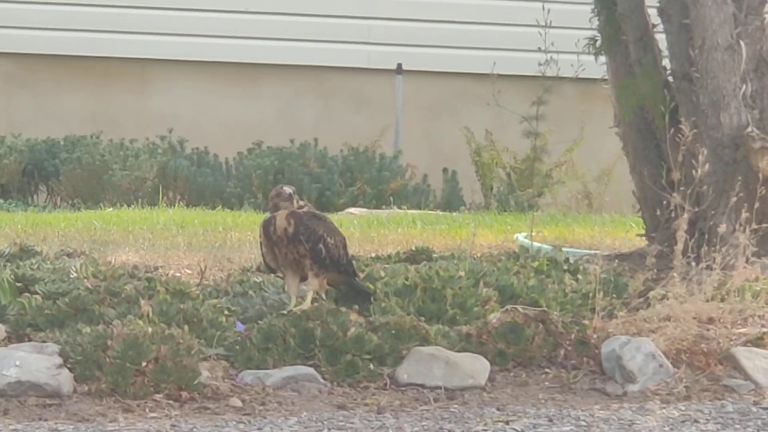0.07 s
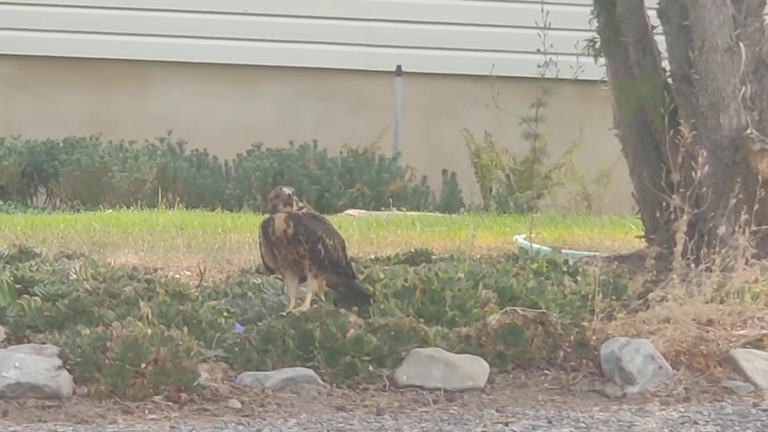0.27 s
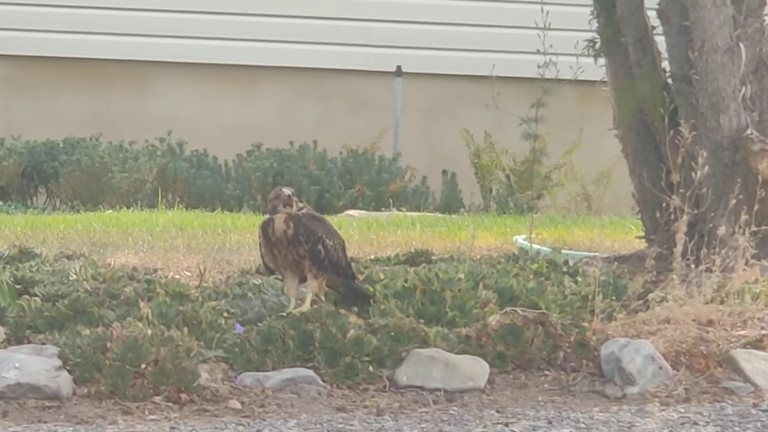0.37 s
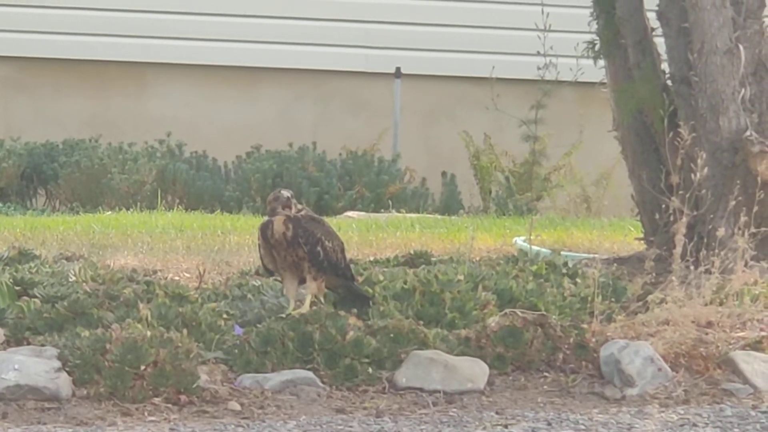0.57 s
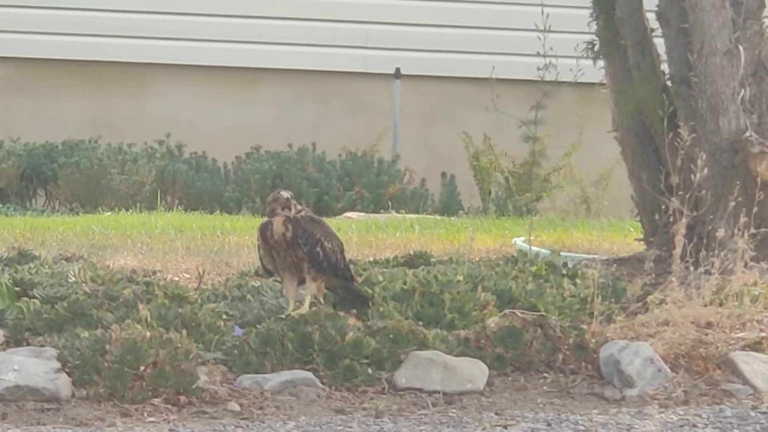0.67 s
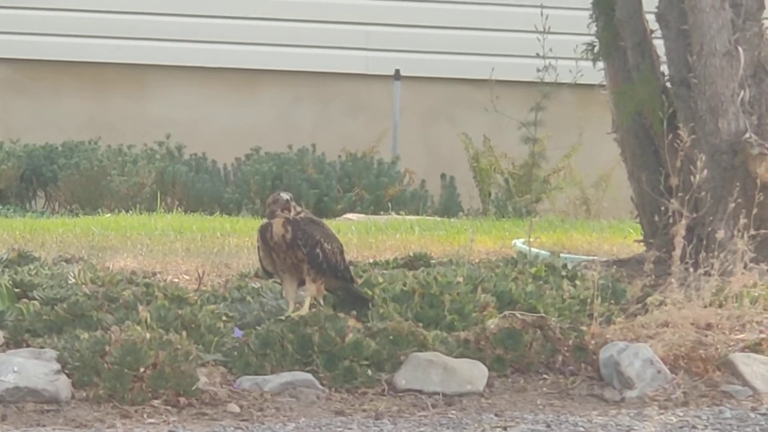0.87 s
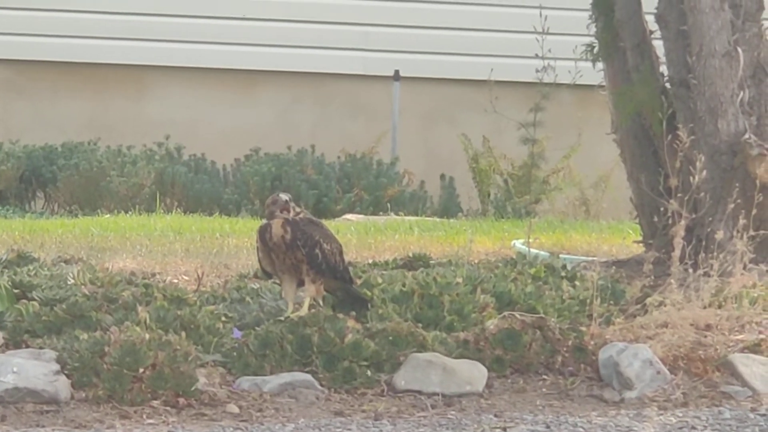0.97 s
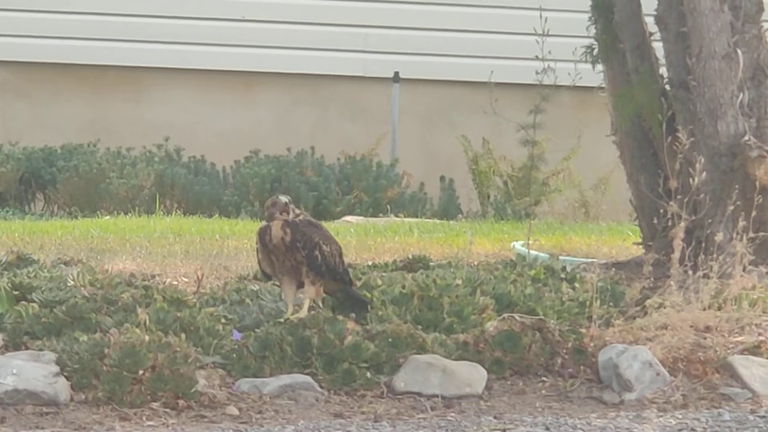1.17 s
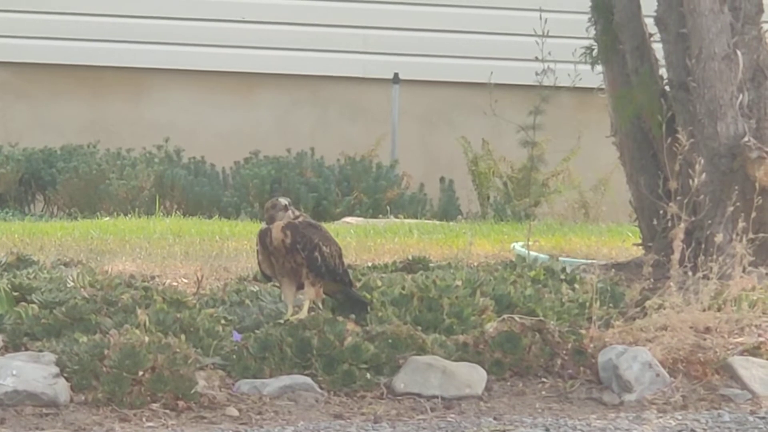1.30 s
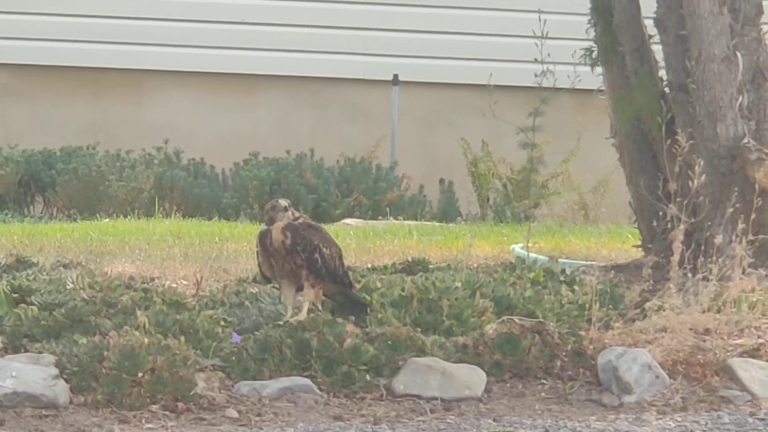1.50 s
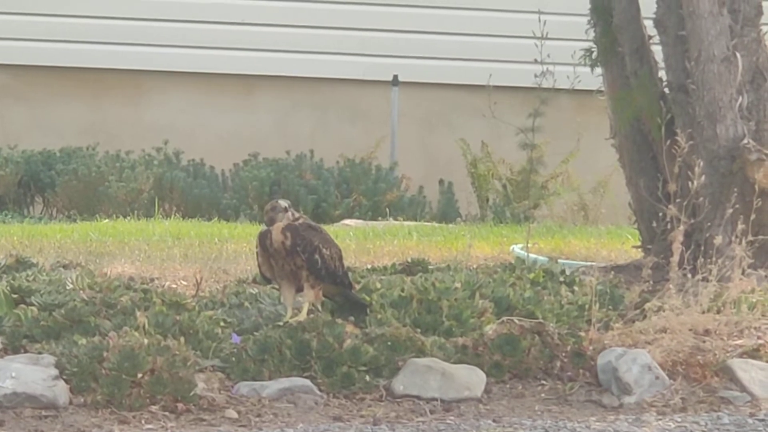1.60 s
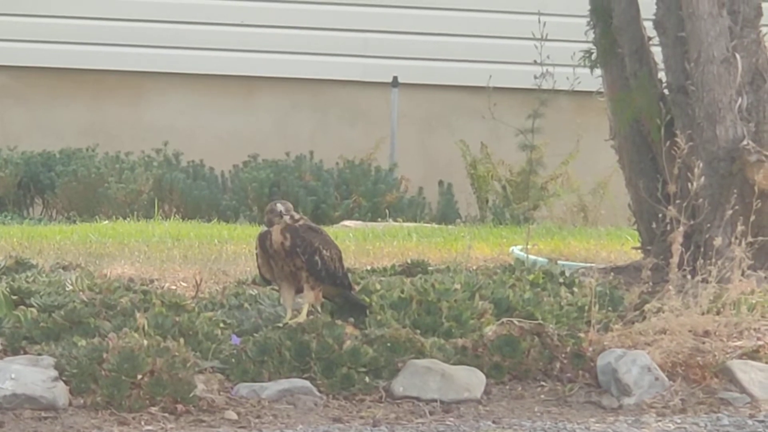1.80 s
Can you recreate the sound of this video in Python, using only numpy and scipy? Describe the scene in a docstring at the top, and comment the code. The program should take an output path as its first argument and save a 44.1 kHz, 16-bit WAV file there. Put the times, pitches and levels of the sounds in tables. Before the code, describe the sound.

One long hawk cry, clear then raspy, rings out in a quiet garden.

```python
"""A low outdoor rumble and a few small, close ticks; then a young hawk on the ground in a garden gives one
long scream that starts clear and turns hoarse. Its syrinx vibrates periodically, making harmonics whose
pitch leaps up, sags slowly and drops away. Period doubling adds half-pitch lines and chaotic vibration
adds a rasp; both come and go between the harmonics. A house wall and the yard reflect the call faintly."""
import sys
import numpy as np
from scipy import signal
from scipy.fft import rfft, irfft
from scipy.io import wavfile

SR = 44100
rng = np.random.default_rng(int(sys.argv[2]) if len(sys.argv) > 2 else 0)


def digitize_waveform(pressure):
    """Quantize a signal to 16-bit integers and store it at the path in sys.argv[1].

    Rows of a 2-D input are taken as channels; values are limited to [-1, 1].
    """
    field = np.atleast_2d(pressure).T
    bounded = np.clip(field, -1, 1)
    quanta = np.round(bounded * 32767).astype(np.int16)
    wavfile.write(sys.argv[1], SR, quanta)


N = 81585
TIME = np.arange(N) / SR
FREQ = np.fft.rfftfreq(N, 1 / SR)

# Envelopes of the three strong harmonics: (time [s], 2nd [dB], 3rd [dB], 5th [dB])
STRONG_HARMONICS = [(0.168, -63.5, -63, -78), (0.19, -50.5, -41.5, -69), (0.21, -48.5, -40, -55),
                    (0.232, -37.5, -38, -55.5), (0.258, -33.5, -48.5, -53.5), (0.295, -33, -45.5, -55.5),
                    (0.34, -32.5, -47.5, -60.5), (0.4, -32, -44.5, -53.5), (0.5, -33, -41, -49),
                    (0.55, -35.5, -37, -55.5), (0.632, -36, -35.5, -53.5), (0.648, -34.5, -37.5, -59),
                    (0.664, -34.5, -35.5, -47.5), (0.72, -34, -38.5, -43.5), (0.8, -37, -38.5, -45.5),
                    (0.82, -35, -38, -45), (0.845, -39.5, -31, -50), (0.9, -36, -34.5, -47),
                    (0.96, -33.5, -34.5, -46), (1.05, -35.5, -40.5, -45.5), (1.15, -39.5, -35.5, -44),
                    (1.18, -43, -40, -45), (1.198, -41, -52, -43), (1.225, -44, -39.5, -45.5),
                    (1.275, -41.5, -37.5, -47.5), (1.3, -43.5, -36.5, -55), (1.32, -48.5, -37, -66),
                    (1.345, -66, -71, -61)]
# Envelope of the rasp: (time [s], level [dB], treble boost [dB])
RASP_ENVELOPE = [(.16, -80, -5), (.175, -59, -7), (.25, -66.5, -1), (.335, -64, -4), (.365, -53.5, 0),
                 (.42, -59.5, -3), (.48, -45.5, -12.5), (.505, -61, -8), (.62, -61, 2), (.652, -51, -2),
                 (.69, -55, -8), (.78, -48, -2.5), (.82, -52, -5), (.865, -52.5, -2), (.92, -51.5, -3.5),
                 (1.08, -46.5, 0), (1.125, -52, -2), (1.16, -45.5, -4), (1.22, -44, -1.5), (1.3, -49, 2.5),
                 (1.335, -53.5, -2.5), (1.36, -89, 11)]
# Response of the throat: (frequency [Hz], gain [dB], left minus right [dB])
THROAT_RESPONSE = [(300, -20.5, 3), (1490, -23.5, 5.5), (2460, -14.5, 9), (2870, -4, 5), (3400, 1, 12),
                   (3610, -4, 7), (4300, -10, 5), (5360, -9.5, 7), (5850, -9, -12.5), (7250, -12.5, -13),
                   (8550, -17.5, -9), (9220, -12.5, -6), (10600, -29.5, -7), (12500, -42, -6),
                   (14800, -30, -2)]


def amp(db):
    """Amplitude ratio of a level in decibels."""
    return 10 ** (np.asarray(db) / 20)


def unit(x):
    """Normalisation to rms 1."""
    return x / np.sqrt(np.mean(x ** 2) + 1e-20)


def curve(table):
    """Linear interpolation of a time table's columns at every sample."""
    s, *columns = np.transpose(table)
    return [np.interp(TIME, s, c) for c in columns]


def spectrum(table, hz):
    """Interpolation of a frequency table's columns on a logarithmic frequency axis."""
    f, *columns = np.transpose(table)
    return [np.interp(np.log(hz + 1), np.log(f + 1), c) for c in columns]


def pan(db):
    """Left and right gains for an interchannel level difference."""
    return amp(np.array([np.atleast_1d(db), -np.atleast_1d(db)]) / 2)


def wander(hz):
    """Random modulation: low-pass Gaussian noise of rms 1, with bandwidth hz."""
    return unit(irfft(rfft(rng.standard_normal(N)) * np.exp(-(FREQ / hz) ** 2) * (FREQ > 0), N))


def noise_pair(correlation):
    """Partial coherence: spectra of two noises that share a common component."""
    a, b = rfft(rng.standard_normal((2, N)))
    c = np.clip(correlation, -1, 1)
    return np.array([a, c * a + np.sqrt(1 - c ** 2) * b])


def air():
    """Outdoor rumble and hiss: coloured noise, most coherent in the bass, that swells slowly."""
    # Ambient noise spectrum: (frequency [Hz], relative spectral density [dB])
    density = [(20, -5), (38, 2), (52, -3), (75, -4.5), (115, -6), (180, -12.5), (235, -12.5), (300, -18),
               (600, -21), (1300, -23.5), (2800, -32.5), (5000, -40), (8600, -43.5), (15500, -35.5)]
    # Likeness of left and right: (frequency [Hz], correlation [-1 to 1])
    correlation = [(60, 0.86), (180, 0.8), (550, 0.24), (1650, -0.36), (4970, -0.31), (15000, -0.03)]
    # Lean to the left: (frequency [Hz], left minus right [dB])
    balance = [(60, 1.2), (180, 2.8), (550, 4.4), (1650, 6.2), (4970, 4.4), (15000, 2.5)]
    # Swell of the background: (time [s], gain [dB])
    swell = [(0, 3.5), (.15, 1.5), (.23, 5), (.33, 4.5), (.55, 6.5), (.8, 7.5), (1.05, 6.5), (1.3, 8.5),
             (1.42, 3), (1.85, 0.5)]
    white = noise_pair(spectrum(correlation, FREQ)[0])
    coloured = white * amp(spectrum(density, FREQ)[0]) * pan(spectrum(balance, FREQ)[0])
    return unit(irfft(coloured, N)) * amp(-56 + curve(swell)[0] + 0.5 * wander(hz=18))


def rustle():
    """A crackly rustle and ticks, close on the left; each tick is a noise burst with a damped resonance."""
    # Envelope of the rustle: (time [s], level [dB])
    envelope = [(0, -60), (.04, -61), (.11, -68), (.145, -78), (.22, -75), (.29, -64), (.36, -65.5),
                (.42, -71.5), (1.52, -81), (1.59, -71), (1.66, -83), (1.85, -76.5)]
    # Spectrum of rustle and bursts: (frequency [Hz], relative spectral density [dB])
    density = [(100, -9), (700, -2), (1500, 2.5), (3500, -1.5), (5000, -2), (5800, -17.5), (9000, -18.5),
               (15000, -25.5)]
    # Ticks: (time [s], level [dB], ring frequency [Hz], ring level re tick [dB])
    ticks = [(0.0195, -53, 3000, -20), (0.035, -59, 3450, -21), (.0935, -52, 1520, -8),
             (.115, -55.5, 1490, -3), (0.1702, -46.5, 3450, 0.5), (0.279, -48, 2000, -19),
             (.838, -49, 1900, 3), (1.223, -41.5, 3500, -16), (1.435, -55, 2980, -24),
             (1.568, -59.5, 1920, -1), (1.59, -60, 1410, 10), (1.725, -55, 1270, -16),
             (1.8159, -52, 3960, -16)]
    burst_decay_s, ring_decay_s = 0.00091, 0.0017
    drive = amp(curve(envelope)[0] + 2.7 * wander(hz=253)) * rng.standard_normal(N)
    rings = np.zeros(N)
    for s, db, ring_hz, ring_db in ticks:
        age, onset = np.maximum(TIME - s, 0), amp(db) * (TIME >= s)
        drive += onset * np.exp(-age / burst_decay_s) * rng.standard_normal(N)
        rings += onset * amp(ring_db) * np.exp(-age / ring_decay_s) * np.sin(2 * np.pi * ring_hz * age)
    colour = unit(amp(spectrum(density, FREQ)[0]))
    return pan(db=17) * (irfft(rfft(drive) * colour, N) + rings)


def yard(call):
    """Reflection: two echoes from wall and trees, and an exponential tail that lingers near 4 kHz."""
    # Reverberant tail: (frequency [Hz], reverberation time T60 [s], relative level [dB])
    reverberation = [(1300, 0.81, -6), (2700, 0.33, -15), (3560, 0.37, -3.5), (4060, 1.08, 1.5),
                     (5400, 0.21, 4.5), (8000, 0.17, -17)]
    # Early reflections: (delay [s], left gain [dB], right gain [dB])
    echoes = [(.0115, -24, -27), (.026, -23, -29.5)]
    hz, t, noise = signal.stft(rng.standard_normal((2, SR)), SR, nperseg=256)
    t60, db = spectrum(reverberation, hz)
    decay = amp(db[:, None] - 60 * t / t60[:, None])
    response = signal.istft(noise * decay, SR, nperseg=256)[1]
    response *= amp(db=-27) / np.linalg.norm(response[0])
    for s, left_db, right_db in echoes:
        response[:, round(s * SR)] += amp([left_db, right_db])
    return signal.fftconvolve(call.mean(0)[None], response, axes=1)[:, :N]


def cracks():
    """Where the voice breaks, narrow-band noise sounds as short unsteady squeaks between the harmonics."""
    # Squeaks: (time [s], half length [s], centre [Hz], half width [Hz], level [dB])
    squeaks = [(.652, 0.014, 6450, 340, -51), (0.44, .012, 3350, 44, -50), (0.48, .014, 3330, 150, -53),
               (0.83, 0.12, 3110, 32, -56), (.695, 0.053, 6040, 35, -58.5), (.675, 0.04, 4700, 40, -62)]
    out = np.zeros((2, N))
    for s, half_s, hz, width_hz, db in squeaks:
        band = unit(irfft(rfft(rng.standard_normal(N)) * np.exp(-((FREQ - hz) / width_hz) ** 2), N))
        envelope = amp(db) * np.exp(-((TIME - s) / half_s) ** 2)
        out += pan(spectrum(THROAT_RESPONSE, hz)[1]) * envelope * band
    return out


def rasp(phase):
    """Chaotic vibration: noise pulsed by each cycle and filtered by the throat, plus a wavering tone."""
    pulse_depth, treble_hz, flutter_db = 0.31, 4970, 3.4
    level_db, boost_db = curve(RASP_ENVELOPE)
    throat_db, side_db = spectrum(THROAT_RESPONSE, FREQ)
    puffs = irfft(noise_pair(correlation=0.69), N) * (1 + pulse_depth * np.cos(phase))
    hoarse = unit(irfft(rfft(puffs) * amp(throat_db) * pan(side_db), N))
    treble = irfft(rfft(hoarse) * np.clip((FREQ - treble_hz) / 1000 + .5, 0, 1), N)
    hoarse += (amp(boost_db) - 1) * treble
    pitch_multiple = 2.42 + 0.086 * wander(hz=108.3)
    tone = unit(np.cos(np.cumsum(pitch_multiple * np.gradient(phase))))
    side_tone = amp(db=-8) * pan(spectrum(THROAT_RESPONSE, hz=3300)[1]) * tone
    return (hoarse + side_tone) * amp(level_db + flutter_db * wander(hz=89))


def half_lines(phase, pitch_hz):
    """Period doubling: strong and weak cycles alternate, putting lines halfway between the harmonics."""
    # Envelope of the half-pitch lines: (time [s], level [dB])
    doubling = [(.31, -87), (.37, -50), (.47, -48), (.53, -46.5), (.62, -60), (.66, -50), (.7, -64),
                (.76, -46), (.83, -75)]
    # Half-pitch lines: (frequency [multiple of the pitch], relative level [dB])
    partials = [(1.5, -19), (2.5, -2), (3.5, -18.5), (4.5, -16), (5.5, -18.5), (6.5, -22), (8.5, -32),
                (10.5, -30)]
    lines = np.zeros((2, N))
    for k, db in partials:
        lines += amp(db) * pan(spectrum(THROAT_RESPONSE, k * pitch_hz)[1]) * np.cos(k * phase)
    return np.sqrt(2) * amp(curve(doubling)[0]) * lines


def syrinx(phase, pitch_hz, roughness):
    """Periodic vibration makes a harmonic series; each partial has its own stereo level and phase."""
    # Vocal effort: (time [s], level of the weaker harmonics [dB], strain [0 clear to 1 strained])
    effort = [(.168, -22, .5), (.2, -8, 1), (.26, -3.5, 0.46), (.34, -0.5, 0), (.64, 0, 0.17),
              (.657, -1.5, 0.6), (.805, 0, 0), (.822, -1, 1), (.92, -0.5, 0.73), (1.14, 0.5, 0.81),
              (1.25, 2, 0.78), (1.315, -8, 0.98), (1.345, -28, .8)]
    # Harmonics: (number, clear gain [dB], strained gain [dB], left minus right [dB], left lead [rad])
    harmonics = [(1, -45, -43, 11.5, 0.41), (2, 0.5, -0.5, 2.5, -.5), (3, 1.5, -0.5, 11, -1.6),
                 (4, -59, -48.5, -6.5, -1.8), (5, -0.5, 0, -10.5, -1.26), (6, -68, -52, -11, -0.61),
                 (7, -64, -63, -5.5, -0.72), (8, -78.5, -71, -6, -.5), (9, -87, -67, -10, 0),
                 (10, -65.5, -79, -8, 0), (11, -64.5, -73, -2, .3)]
    beak_hz, beak_width_hz, beak_db = 6450, 160, 5  # resonance of the beak
    break_s, break_db, break_above_hz = 0.72, -6, 13300  # the top harmonics dim when the voice breaks
    dispersion_rad = 0.898  # the throat delays higher harmonics more
    strong_db = dict(zip((2, 3, 5), curve(STRONG_HARMONICS)))
    effort_db, strain = curve(effort)
    catch_db = 3.5 * np.exp(-((TIME - 0.25) / 0.052) ** 2)  # overtones flutter as the voice rises
    broken = np.clip((TIME - break_s) / .005, 0, 1)
    out = np.zeros((2, N))
    for k, clear_db, strained_db, side_db, lead in harmonics:
        resonance_db = beak_db * np.exp(-((k * pitch_hz - beak_hz) / beak_width_hz) ** 2)
        db = strong_db.get(k, effort_db + resonance_db) + clear_db + (strained_db - clear_db) * strain
        db += break_db * (k * pitch_hz.max() > break_above_hz) * broken
        flutter_db = (k > 2) * catch_db * wander(hz=109)
        flutter_db += 1.04 * np.log(k) * roughness * wander(hz=109)  # and again when it is hoarse
        shimmer_db = 0.5 * (1 + roughness) * wander(hz=48.3)
        stereo = pan(side_db) * np.exp(.5j * lead * np.array([[1], [-1]]))
        partial = stereo / abs(stereo.mean()) * np.exp(1j * (k * phase - dispersion_rad * k ** 2))
        out += np.sqrt(2) * amp(db + shimmer_db + flutter_db) * partial.real
    return out


def hawk():
    """One scream; random frequency modulation makes the pitch tremble more as the rasp grows."""
    # Fundamental of the syrinx: (time [s], frequency [Hz])
    pitch = [(0.17, 900), (0.19, 1198), (0.215, 1308), (0.258, 1390), (0.31, 1397), (0.35, 1383),
             (0.43, 1367), (0.478, 1356), (0.5, 1362), (0.56, 1350), (0.645, 1355), (0.655, 1332),
             (0.72, 1344), (0.805, 1350), (0.83, 1343), (0.96, 1340), (1.09, 1324), (1.22, 1298),
             (1.27, 1267), (1.3, 1219), (1.32, 1105), (1.34, 980)]
    pitch_hz = curve(pitch)[0]
    roughness = amp(curve(RASP_ENVELOPE)[0])
    roughness /= roughness.max()
    jitter, tremble = 0.0014 * wander(hz=157), 0.0015 * wander(hz=55)
    deviation = (0.29 + 1.45 * roughness) * (jitter + tremble)
    phase = 2 * np.pi * np.cumsum(pitch_hz * (1 + deviation)) / SR
    start_s, end_s, fade_s = STRONG_HARMONICS[0][0], STRONG_HARMONICS[-1][0], 0.0023
    gate = np.clip(np.minimum(TIME - start_s, end_s - TIME) / fade_s, 0, 1)
    voiced = syrinx(phase, pitch_hz, roughness) + half_lines(phase, pitch_hz)
    return gate * voiced + rasp(phase) + cracks()


def scene():
    """Superposition of the direct call, its reflections and the garden background."""
    call = hawk()
    return call + yard(call) + air() + rustle()


def record(dry):
    """Band limiting by a linear-phase low-pass filter."""
    cutoff_hz = 15800
    lowpass = signal.firwin(511, cutoff_hz, window=("kaiser", 9), fs=SR)
    return signal.oaconvolve(dry, lowpass[None], "same")


dry = scene()
out = record(dry)
digitize_waveform(out)
```